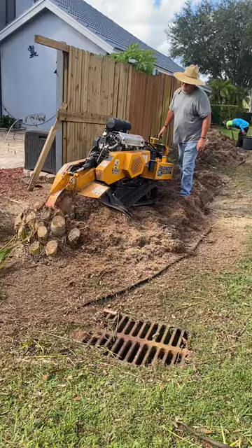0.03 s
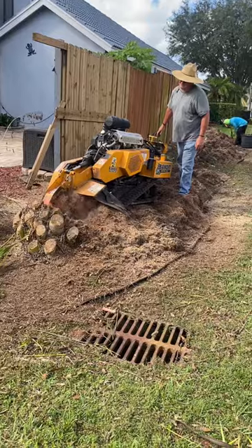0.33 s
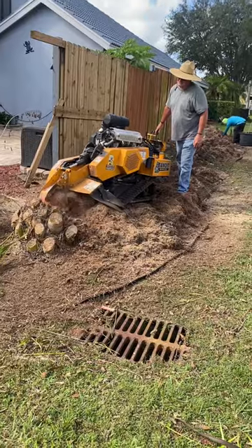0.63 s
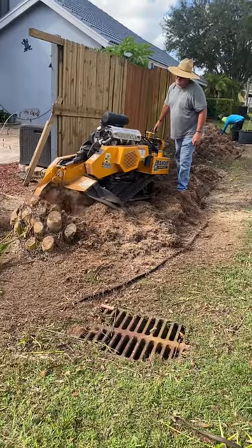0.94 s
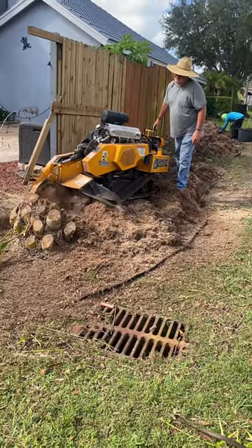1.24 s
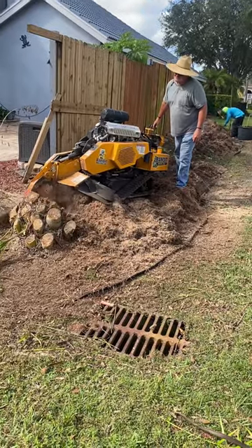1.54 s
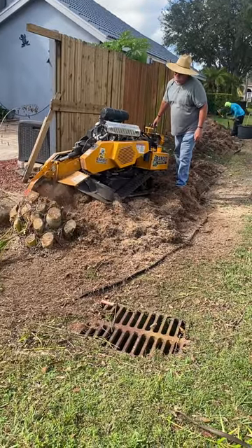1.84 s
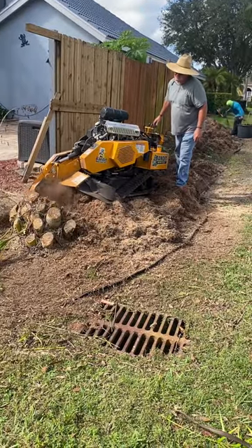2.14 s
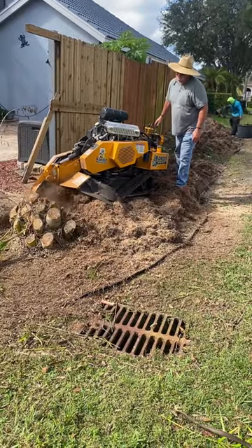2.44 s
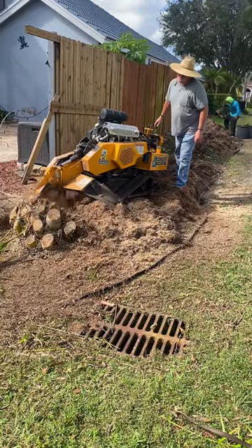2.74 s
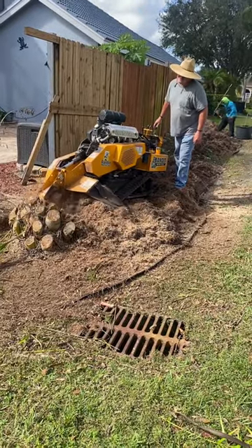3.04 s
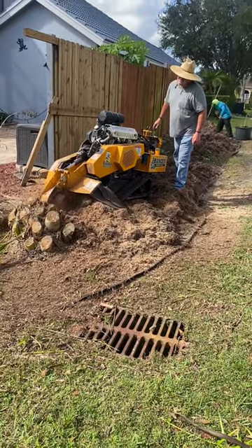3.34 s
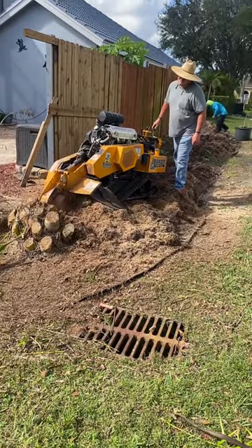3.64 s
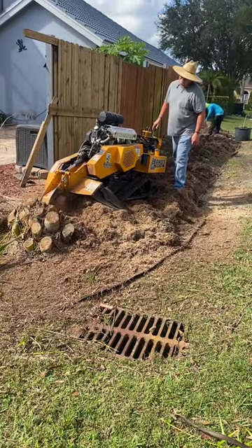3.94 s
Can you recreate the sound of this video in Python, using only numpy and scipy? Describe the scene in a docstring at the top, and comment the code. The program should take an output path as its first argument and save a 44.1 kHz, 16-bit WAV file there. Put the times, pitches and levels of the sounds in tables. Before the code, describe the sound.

Outdoors, a few metres from the microphone, a stump grinder throbs and hisses over rushing fan air and spraying chips. The engine speeds up as the cutter comes free, then labours harder while the wheel's hum slides down.

```python
"""A stump grinder chews a palm stump outdoors, a few metres away, in front of a wooden fence.
Its two-cylinder engine fires in uneven pairs: a deep throb, with a hiss and a sharp bark each time.
It races and softens when the cutter wheel comes free, then slows and barks hard as the teeth bite
again and the wheel's hum slides down. Wood chips patter over the rush of the fan."""
import sys
import numpy as np
from scipy import signal
from scipy.fft import rfft, irfft, next_fast_len
from scipy.io import wavfile

SR = 44100
rng = np.random.default_rng(int(sys.argv[2]) if len(sys.argv) > 2 else 0)


def master(y):
    """Save y as 16-bit WAV."""
    cut = np.clip(np.atleast_2d(y).T, -1, 1)
    pcm = np.round(cut * 32767)  # scale
    wavfile.write(sys.argv[1], SR, pcm.astype(np.int16))


N = 176400
T = np.arange(N) / SR
SIZE = next_fast_len(N + SR // 2)
HZ = np.arange(SIZE // 2 + 1) * SR / SIZE

# Engine speed. Each row: time in seconds, cycles per second (each cylinder fires once a cycle).
ENGINE_SPEED = [(0.0, 26.142), (0.4, 25.899), (0.7, 25.723), (1.1, 25.919), (1.3, 26.932), (1.55, 27.751),
                (1.8, 28.821), (2.0, 29.251), (2.25, 28.066), (2.55, 28.104), (2.8, 27.806), (3.0, 26.615),
                (3.15, 25.337), (3.35, 25.042), (3.6, 25.475), (4.0, 25.759)]
# How hard the wheel bites. Each row: time in seconds, load from 0 (free) to 1 (full).
ENGINE_LOAD = [(0, 0.62), (.45, 0.68), (.9, 0.74), (1.36, 0.61), (1.5, 0.44), (1.95, 0.12), (2.3, 0.18),
               (2.72, 0.18), (2.95, 0.47), (3.12, 0.87), (3.25, 0.92), (3.42, 0.98), (3.56, 0.83),
               (4, 0.93)]
# Firings of set strength, mostly extra hard. Each row: time in seconds, dB above a normal firing.
SET_FIRINGS = [(.043, 4), (.428, 0), (.815, 2), (.932, 4), (1.008, 1.5), (1.2, 3.5), (3.138, 1),
               (3.217, 4.5), (3.297, 4.5), (3.353, 2.5), (3.457, 5.5), (3.731, 4.5), (3.887, 2),
               (3.965, -4)]
# Tones of the throb. Each row: multiple of engine speed, dB running free, dB at full load.
THROB_TONES = [(2, -21.5, -28), (3, -28.5, -18.5), (5, -31.5, -23), (6, -32.5, -28.5), (7, -43.5, -34.5),
               (8, -40, -31.5), (10, -38, -32), (11, -42.5, -34), (12, -44, -50.5), (13, -43, -31),
               (14, -62, -34), (15, -81, -41.5), (16, -87, -32)]
# Tone colours of the exhaust's crack, thud, hiss and growl. Each row: frequency in Hz, relative dB.
CRACK_COLOUR = [(200, -13), (500, -12), (760, -1.5), (980, 2), (1200, 10), (1480, 5.5), (1920, 4.5),
                (2700, -2), (3700, -16), (6000, -22), (14000, -29)]
THUD_COLOUR = [(200, -16), (500, -16), (700, 0.5), (880, 4.5), (1000, -9), (1180, -2), (1600, -20),
               (4000, -69)]
HISS_COLOUR = [(1000, -4.5), (2800, 3), (4000, -3.5), (4650, 5), (4980, 6.5), (5250, 8.5), (5600, 7),
               (6200, 8), (8000, -10), (11000, -0.5), (13000, -14.5), (15800, -42)]
GROWL_COLOUR = [(70, -17), (105, 15), (170, -8.5), (330, 12.5), (480, -4.5), (620, -2), (790, 7.5),
                (1000, -6.5), (2000, -26), (5000, -59)]
# Swells of the valve hiss. Each row: time in seconds, added level in dB.
HISS_SWELLS = [(0, -1), (.5, 1.5), (.9, -1), (1.15, 5.5), (1.35, -1.5), (1.52, 6.5), (1.72, 3.5),
               (1.95, -3), (2.25, 2), (2.8, 0), (3, 4), (3.4, 6), (3.6, 0.5)]
# The wheel's hum. Each row: time in seconds, pitch as a multiple of engine speed, level in dB.
WHEEL_HUM = [(1.0, 4.33, -47), (1.7, 4.36, -35), (2.72, 4.33, -35), (2.92, 4.22, -28), (3.15, 3.95, -31),
             (3.45, 3.6, -48)]
# Spray of chips off the wheel. Each row: time in seconds, level in dB.
CHIP_LEVEL = [(0, -48), (.5, -36), (.85, -38), (1.15, -39), (1.35, -37), (1.52, -43), (1.95, -37),
              (2.25, -34.5), (2.8, -43), (3.05, -54), (3.4, -43), (3.6, -39)]
# Larger chips strike the guard. Each row: start in seconds, level in dB.
GUARD_TICKS = [(0.054, -22), (1.177, -25), (2.23, -31), (3.193, -23)]
# Teeth rasp on hard fibres. Each row: time of the peak in seconds, level in dB, fade time in seconds.
TOOTH_RASPS = [(2.075, -31, 0.032), (2.116, -23, 0.0023)]
# Tone colours of the chips, rasps and fan. Each row: frequency in Hz, relative dB.
CHIP_COLOUR = [(500, -4), (1800, 9.5), (2800, 19), (3600, 9.5), (5300, 11.5), (8000, -1), (11500, 2),
               (15800, -23)]
RASP_COLOUR = [(800, 5), (2000, 9), (3400, 10), (4600, 7), (6500, -31), (14000, -34)]
FAN_COLOUR = [(25, -7), (60, 7), (100, 0), (160, 9), (350, 2.5), (500, 3), (780, 8.5), (1020, -4),
              (1300, -1), (2000, -4.5), (2900, -6), (4000, -12.5), (5200, -12), (8000, -23), (11500, -18),
              (15800, -42)]
# Strength of the fan's rush. Each row: time in seconds, level in dB.
FAN_LEVEL = [(0, -29.5), (2.5, -29), (2.95, -26.5), (3.38, -24), (3.6, -27)]
# Stereo balance. Each row: frequency in Hz, left level minus right level in dB.
STEREO_BALANCE = [(200, 0), (430, .5), (580, -8), (720, -4), (940, -2), (1080, -11), (1300, -13),
                  (1420, -4), (1570, -9), (1800, -1.5), (2700, .5), (3600, -2), (3950, .5), (4300, -6),
                  (5000, 0), (15000, 0)]
# Stereo timing. Each row: frequency in Hz, how far the left wave is ahead in radians.
STEREO_PHASE = [(60, 0), (330, -.1), (440, -.45), (560, -1.1), (750, 0), (1050, -.8), (1400, .7),
                (1750, .5), (2050, 1.1), (2300, .4), (2600, 1.2), (3000, .5), (3500, 1.1), (3900, .4),
                (4400, 1.1), (4900, .4), (6000, 1.8), (7000, 2.85), (9700, 6.2), (11300, 6.4), (12700, 9.1),
                (15500, 9.3)]

FIRST_FIRING_S, SECOND_CYLINDER = .0422, 270 / 720  # the second fires this share of a cycle later


def firings(cycle, jitter_s=.00012, spread_db=1.4):
    """The cylinders fire unevenly. Gives each firing's time, cylinder (0 or 1), load and extra dB."""
    due = np.add.outer(np.arange(int(cycle[-1]) + 1), [0, SECOND_CYLINDER]).ravel()
    chance = rng.standard_normal((len(due), 2))
    times = np.interp(due, cycle, T) + jitter_s * chance[:, 0]
    db = spread_db * np.clip(chance[:, 1], -2, 1.5)
    for when, extra_db in SET_FIRINGS:
        db[np.argmin(abs(times - when))] = extra_db
    cylinder = np.arange(len(times)) % 2
    heard = due < cycle[-1]
    return times[heard], cylinder[heard], curve(ENGINE_LOAD, times)[heard], db[heard]


def exhaust_throb(cycle, muffler_lag_hz=93.5, delay_s=.00068, waver=.016):
    """The paired firings make a stack of deep tones; the lowest leave the muffler late."""
    throb, speed, load = 0, curve(ENGINE_SPEED), curve(ENGINE_LOAD)
    for multiple, free_db, loaded_db in THROB_TONES:
        hz = multiple * speed
        pair_phase = np.angle(1 + np.exp(-2j * np.pi * multiple * SECOND_CYLINDER))
        turns = multiple * cycle + muffler_lag_hz / hz - delay_s * hz
        gain = from_db(free_db + (loaded_db - free_db) * load) * (1 + waver * multiple * drift(3.3))
        throb = throb + np.sqrt(2) * gain * np.cos(2 * np.pi * turns + pair_phase)
    return throb


def exhaust_barks(times, cylinder, load, db, lead_s=.0006, sweep_cycles=1.15):
    """Each firing leaves the pipe as a knock that sweeps down from a crack to a hollow thud."""
    crack = from_db(-27) * puffs(times - lead_s, db + 22 * load, CRACK_COLOUR)
    thud = from_db(-31) * puffs(times - lead_s, db + 14 * load - 7.5 * cylinder, THUD_COLOUR)
    sweep = np.exp(-2j * np.pi * sweep_cycles * np.log1p(HZ / 200))  # the pipe delays low notes most
    return filtered(crack + thud, sweep)


def puffs(times, db, spectrum, size=512, roughness=.24, decay_s=.0013):
    """Each puff of gas is a sharp pulse with a short tail of swirling noise."""
    shapes = roughness * np.exp(-T[:size] / decay_s) * rng.standard_normal((len(times), size))
    shapes[:, 0] += 1
    weight = from_db(curve(spectrum, np.fft.rfftfreq(size, 1 / SR)))
    gains = from_db(db) / np.linalg.norm(rfft(shapes) * weight, axis=1)  # evens out chance loudness
    train = np.zeros(N + size)
    for start, shape, gain in zip((np.maximum(times, 0) * SR).astype(int), shapes, gains):
        train[start:start + size] += gain * shape
    return colour(train, spectrum)


def valve_hiss(times, cylinder, load, db, lead_s=.0026, ring_width_hz=54):
    """Gas jets past the opening valve just before each bark and sets the metal ringing faintly."""
    flicker_db = .5 * rng.standard_normal(len(times))
    load_db = np.where(cylinder == 0, -2, 8) * load
    level = db + curve(HISS_SWELLS, times) + flicker_db + load_db
    bursts = fade(clicks(times - lead_s, level), decay_s=.0057)
    bursts = fade(bursts, decay_s=.001)  # softens each start
    rings = sum(1.03 / (1 + 2j * (HZ - hz) / ring_width_hz) for hz in (5020, 5540, 5830))
    return from_db(-32.5) * colour(filtered(bursts * air(), 1 + rings), HISS_COLOUR)


def muffler_growl(times, cylinder, load, db):
    """The muffler rings roughly after each firing."""
    bursts = fade(clicks(times, db / 2 + 1.5 * load - 5 * cylinder), decay_s=.0059)
    return from_db(-34.5) * colour(bursts * air(), GROWL_COLOUR)


def wheel_hum(octave_db=-10):
    """The cutter wheel hums; as the teeth dig in, its belt slips and the pitch slides down."""
    times, ratio, db = np.transpose(WHEEL_HUM)
    turns = np.cumsum(curve(ENGINE_SPEED) * np.interp(T, times, ratio)) / SR
    hum = np.sin(2 * np.pi * turns) + from_db(octave_db) * np.sin(4 * np.pi * turns)
    return np.sqrt(2) * from_db(np.interp(T, times, db) + drift(10)) * hum


def chip_patter(chips_per_s=6000, spread_db=.5, flicker_db=3.5):
    """Chips fly off the wheel, each a tiny click in a dense patter."""
    sizes = from_db(spread_db * np.minimum(rng.exponential(1, N), 5)) * air()
    hits = rng.random(N) < chips_per_s / SR
    return colour(sizes * hits, CHIP_COLOUR) * from_db(curve(CHIP_LEVEL) + flicker_db * drift(25))


def guard_ticks(low_hz=7300, high_hz=12100):
    """A few larger chips strike the guard with a bright tick."""
    band = HZ / np.hypot(HZ, low_hz) / (1 + (HZ / high_hz) ** 8)
    bursts = fade(clicks(*np.transpose(GUARD_TICKS)), decay_s=.00096)
    return bursts * unit_power(filtered(air(), band))


def tooth_rasps():
    """The teeth scrape hard fibres in brief swells of noise."""
    swells = sum(from_db(db) * np.exp(-((T - peak) / width) ** 2) for peak, db, width in TOOTH_RASPS)
    return swells * colour(air(), RASP_COLOUR)


def fan_rush():
    """Air rushes around the cooling fan, belts and wheel, louder as the wheel digs in."""
    return from_db(curve(FAN_LEVEL)) * colour(air(), FAN_COLOUR)


def yard_echoes(x, ground_s=.002623, dull_hz=5400, scatter_start_s=.0013, die_away_s=.076):
    """Sound bounces dully off the ground and scatters briefly from fence and house."""
    bounce = from_db(-8) * np.exp(-2j * np.pi * HZ * ground_s) / (1 + (HZ / dull_hz) ** 4)
    near = unit_power(filtered(x, 1 + bounce)) * x.std()
    tail = from_db(-60 * np.minimum(T / die_away_s, 5)) * (T > scatter_start_s)
    scatter = unit_power(rng.standard_normal((2, N)) * tail)
    return near + from_db(-15.5) * filtered(x, rfft(scatter, SIZE) / np.sqrt(N))


def air(unlike_from_hz=350):
    """Noise of swirling air: left and right are alike in the bass, partly unlike above."""
    each_side = filtered(rng.standard_normal((2, N)), HZ / np.hypot(HZ, unlike_from_hz))
    return rng.standard_normal(N) + from_db(-8) * each_side


def from_db(db):
    """Turn decibels into a gain."""
    return 10 ** (np.asarray(db) / 20)


def unit_power(x):
    """Scale to an average power of 1."""
    return x / np.sqrt(np.mean(x ** 2) + 1e-20)


def curve(rows, at=T):
    """Join a table's points with straight lines."""
    return np.interp(at, *np.transpose(rows))


def over_hz(rows):
    """Join (Hz, value) points, giving each octave equal room."""
    hz, value = np.transpose(rows)
    return np.interp(np.log(HZ + 1), np.log(hz), value)


def filtered(x, response):
    """Scale and shift each frequency by the given response."""
    return irfft(rfft(x, SIZE) * response, SIZE)[..., :N]


def colour(x, spectrum):
    """Give a sound a tone colour and a power of 1."""
    cepstrum = irfft(np.log(from_db(over_hz(spectrum))), SIZE)
    cepstrum[1:SIZE // 2] *= 2  # folded so the filter rings after a click, never before
    cepstrum[SIZE // 2 + 1:] = 0
    return unit_power(filtered(x, np.exp(rfft(cepstrum))))


def drift(rate):
    """A smooth random wobble of size about 1 that changes about `rate` times a second."""
    knots = rng.standard_normal(2048)
    hz = np.arange(len(knots) // 2 + 1) * SR / N
    slow = irfft(rfft(knots) / (1 + (hz / rate) ** 4))
    return np.interp(T, np.linspace(0, T[-1], len(slow)), unit_power(slow))


def fade(x, decay_s):
    """Give every click a dying tail."""
    return signal.lfilter([1], [1, -np.exp(-1 / (decay_s * SR))], x + 1e-18)


def clicks(times, db):
    """One click for each time and level."""
    train, inside = np.zeros(N), (times >= 0) & (times < T[-1])
    train[(times[inside] * SR).astype(int)] = from_db(db[inside])
    return train


def scene():
    """Mix the grinder's sounds. Engine speed times the firings; load sets their force."""
    cycle = np.cumsum(curve(ENGINE_SPEED)) / SR
    cycle -= np.interp(FIRST_FIRING_S, T, cycle)  # engine cycles since the first firing
    fired = firings(cycle)
    deep = exhaust_throb(cycle) + wheel_hum() + muffler_growl(*fired)
    sharp = exhaust_barks(*fired) + valve_hiss(*fired) + chip_patter() + guard_ticks() + tooth_rasps()
    return deep + yard_echoes(sharp) + fan_rush()


def record(dry, start_s=.036, top_hz=16500):
    """Start abruptly, give each pitch its left and right level and timing, clip peaks, cut the top."""
    opening = np.clip((T - start_s) / .00067, 0, 1)
    sides = np.array([[1], [-1]]) / 2
    gain = from_db(sides * over_hz(STEREO_BALANCE))
    gain /= np.sqrt(np.mean(gain ** 2, axis=0))
    stereo = filtered(dry * opening, gain * np.exp(1j * sides * over_hz(STEREO_PHASE)))
    low_pass = signal.cheby2(16, 70, top_hz, fs=SR, output="sos")
    return signal.sosfilt(low_pass, np.clip(stereo, -.95, .95))


dry = scene()
out = record(dry)
master(out)
```